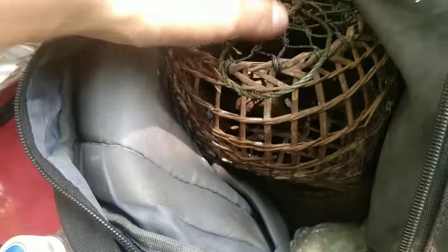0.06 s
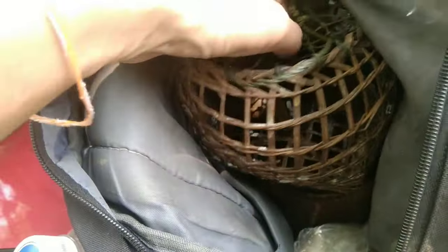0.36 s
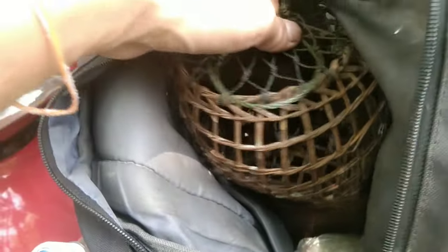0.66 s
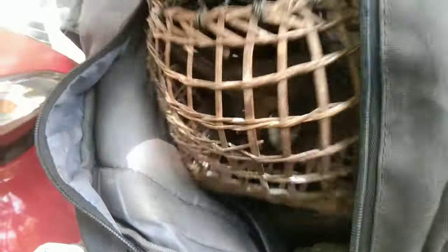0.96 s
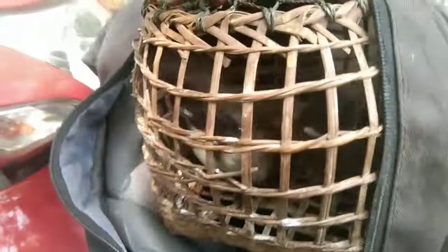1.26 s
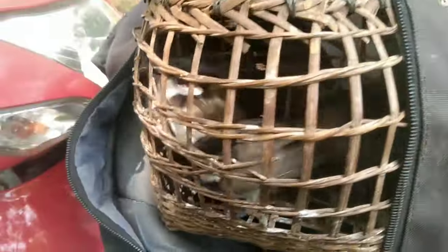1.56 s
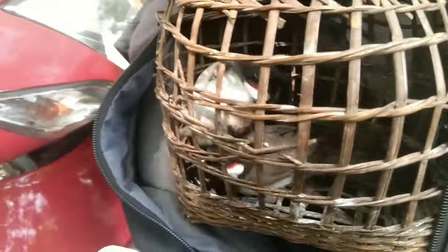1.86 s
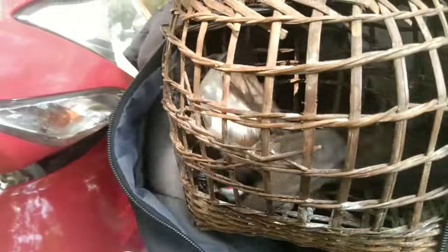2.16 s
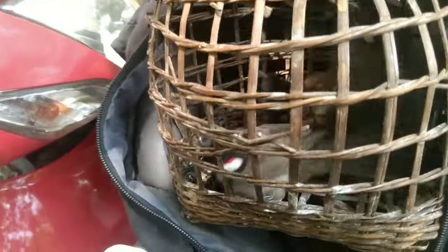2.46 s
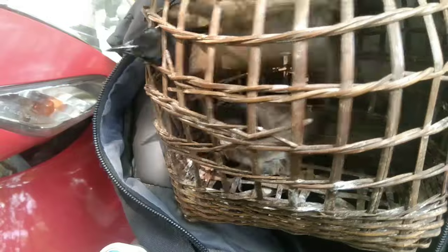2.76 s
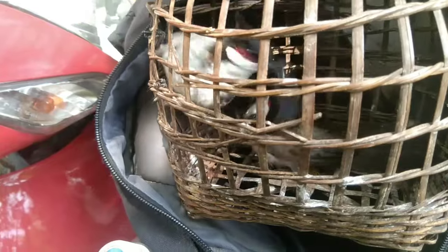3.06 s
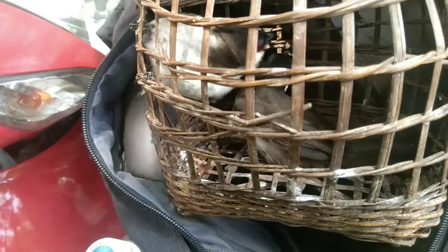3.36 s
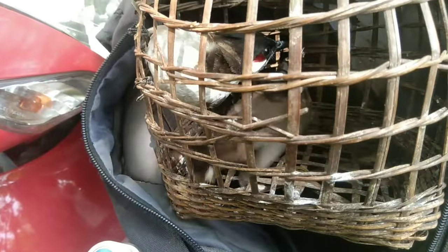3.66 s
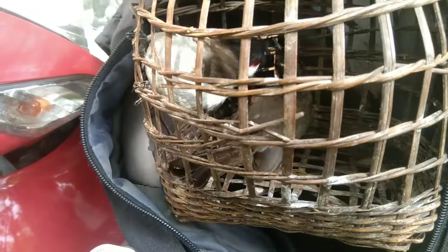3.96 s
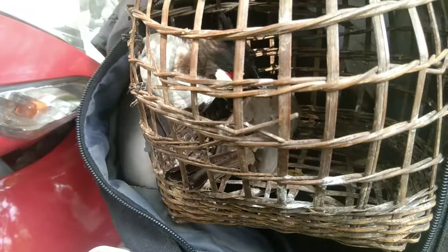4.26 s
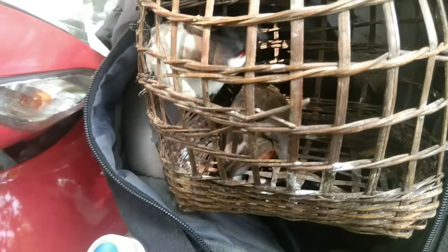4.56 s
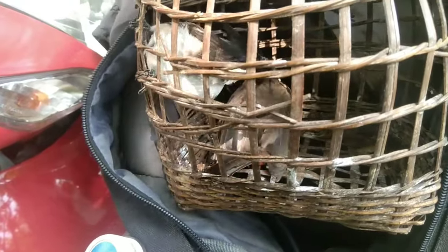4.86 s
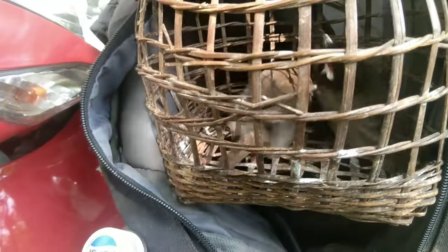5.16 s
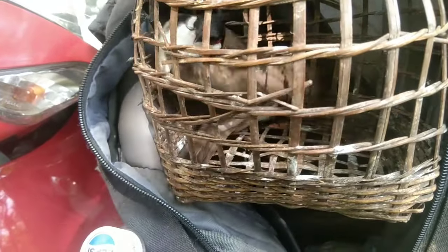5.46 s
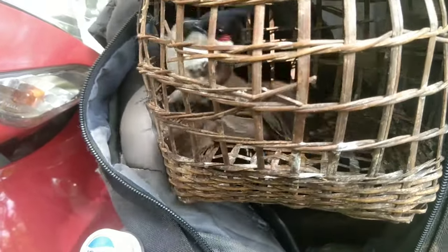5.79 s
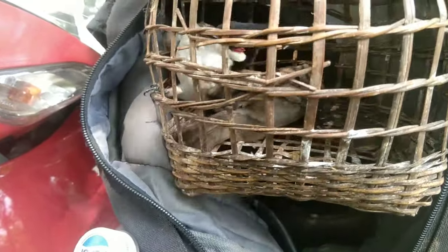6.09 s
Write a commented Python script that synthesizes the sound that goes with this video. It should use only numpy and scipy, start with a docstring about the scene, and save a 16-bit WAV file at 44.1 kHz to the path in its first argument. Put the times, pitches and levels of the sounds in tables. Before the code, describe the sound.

Birds flutter, scratch and bump inside a bamboo cage, whistling softly, with one sharp crack over faint outdoor insects.

```python
"""Wild birds shift and flutter in a woven bamboo cage that stands in an open backpack, outdoors.
Their feathers brush the weave, claws tick on the strips and bodies bump the cage. They whistle and
squeak softly, and once a strip snaps sharply. At the start the cage is moved: it creaks and rumbles
as cloth and a hand slide over it. Behind it all are a low rumble and a steady band of insects."""
import sys
import numpy as np
from scipy import signal
from scipy.fft import rfft, irfft
from scipy.io import wavfile
from scipy.ndimage import uniform_filter1d

SR = 44100
rng = np.random.default_rng(int(sys.argv[2]) if len(sys.argv) > 2 else 0)


def master(y):
    """Save y as 16-bit WAV."""
    cut = np.clip(np.atleast_2d(y).T, -1, 1)
    pcm = np.round(cut * 32767)  # scale
    wavfile.write(sys.argv[1], SR, pcm.astype(np.int16))


N = 270200
TIME = np.arange(N) / SR

# Tone shapes say how strong the low and high parts of a sound are. Columns: frequency_hz, gain_db
RUMBLE_TONE = [(25, -57), (60, -0.5), (100, 4.5), (210, -0.5), (350, -7), (600, -22.5), (900, -49),
               (1330, -19.5), (1550, -78), (4000, -47)]  # distant rumble
HISS_TONE = [(2000, -30), (2900, -8), (3900, -11), (5200, -5), (7500, 1), (9500, -8), (12000, -22),
             (15500, -40)]  # outdoor hiss
HOLLOW_TONE = [(120, -6), (290, -2.5), (450, -6), (1500, -29)]  # the hollow of the cage
SWISH_TONE = [(1200, -19), (2200, -15), (3050, -1), (3700, -6.5), (4800, -15), (5700, -6.5), (7400, 1),
              (8300, -7.5), (10000, -14), (15500, -29.5)]  # brushing over the weave
WEAVE_TONE = [(120, -7), (300, -0.5), (600, 0), (1400, 3.5), (1900, -0.5), (2500, 6), (3500, -24.5),
              (6000, -50)]  # the weave being pushed
SKIN_TONE = [(3000, -26), (5200, -6), (6500, 4.5), (7400, 11.5), (8500, 0.5), (10000, -8.5), (15500, -13.5)]  # a strip's hard skin
WOOD_TONE = [(900, -29), (1900, -25), (2800, 14.5), (3500, 10.5), (4500, 2), (6500, -34)]  # a strip bending
SNAP_TONE = [(300, -21), (1100, -24.5), (2100, -12), (4300, -12), (5800, -4.5), (7000, 3), (8500, 1.5),
             (9300, -9.5), (12700, -14), (15500, -35)]  # a strip cracking
SHIVER_TONE = [(800, -47), (2600, -14.5), (3800, -17), (5000, -5), (6800, 1), (10000, -13), (15500, -21)]  # the weave just after the crack

# Loudness over time. Columns: time_s, level_db
RUMBLE_LEVELS = [(0, -52), (0.3, -57), (2.8, -57), (3.7, -58.5), (6.13, -56)]  # distant rumble
JOSTLE_LEVELS = [(0, -56), (0.35, -57), (0.72, -65), (0.81, -48.5), (0.952, -54.5), (1.1, -58), (1.4, -75)]  # the cage jostled in the bag
SHUFFLE_LEVELS = [(1.3, -52.5), (2.0, -53.5), (3.0, -56), (3.5, -62.5), (3.73, -56.5), (3.87, -77),
                  (4.3, -72.5), (5.0, -67.5), (5.55, -56.5), (5.68, -64.5), (6.13, -73)]  # restless birds between flutters

# Movements on the weave. Columns: start_s, length_s, swish_db, push_above_swish_db
CLOTH_STROKES = [(-0.05, 0.94, -55.5, -3), (0.3, 0.085, -51, -16), (0.635, 0.052, -43.5, -14.5),
                 (0.77, 0.032, -41.5, -13.5), (0.88, 0.46, -46, -9), (1.07, 0.033, -43, -25)]  # the bag and the hand
BIRD_FLUTTERS = [(1.382, 0.076, -44, 4.5), (1.544, .14, -41, -1), (1.775, 0.039, -49, 0.5),
                 (2.099, 0.061, -47.5, 0.5), (2.191, 0.18, -61, 6.5), (2.389, 0.11, -40.5, -1),
                 (2.602, 0.022, -51, 0), (2.794, 0.18, -48, -1.5), (3.152, 0.058, -41.5, -28),
                 (3.278, 0.034, -46.5, -20), (3.585, .06, -52.5, -17), (3.634, 0.057, -55.5, 2.5),
                 (4.093, 0.07, -58, -28), (4.415, 0.035, -53, 0), (4.573, .06, -53, -26),
                 (4.811, 0.12, -53, -5), (5.037, 0.089, -51.5, -26), (5.133, 0.098, -49.5, -0.5),
                 (5.302, 0.091, -58, 2), (5.385, 0.089, -44, -2.5), (5.757, 0.12, -52, -25),
                 (5.898, .2, -54, -5.5)]  # a bird fluttering or shifting

# Bands of insect sound: pitch_hz, width_hz, level_db
INSECT_BANDS = [(4400, 43, -64.5), (4732, 245, -58), (4540, 1050, -62)]
# One rub of the bag's rim: start_s, length_s, level_db
RIM_RUB = (0.95, 0.36, -46)
# Creaks of the weave: start_s, length_s, level_db
WEAVE_CREAKS = [(0.009, .04, -46.5), (0.074, .08, -41.5), (0.231, .02, -44.5), (0.297, .02, -45)]
# How a slipping strip rings: pitch_hz, gain_db
STRIP_RINGS = [(1660, -4), (2500, -1.5)]
# The snap and its rebounds: start_s, level_db, fade_s (a fade is the time to die away by 60 dB)
SNAP_HITS = [(4.769, -11.5, 0.019), (4.781, -22, 0.012), (4.787, -20.5, 0.012), (4.799, -32, 0.02)]
# Bird calls: start_s, length_s, middle_pitch_hz, glide_octaves, level_db
WHISTLE_CALLS = [(2.010, 0.05, 920, 0.17, -60.5), (2.105, 0.045, 1130, -0.61, -51.5),
                 (2.195, 0.038, 1188, -.73, -49), (2.39, 0.059, 1918, -0.184, -44.5),
                 (2.449, 0.057, 1818, .03, -37), (2.532, 0.055, 1790, 0.046, -38.5),
                 (2.618, 0.087, 1573, 0.00033, -46), (2.689, 0.085, 1230, -.44, -54)]
SQUEAK_CALLS = [(5.962, 0.037, 3100, 0.21, -49), (6.015, .07, 3140, -0.063, -53)]  # heard at 3, 4 and 5 times the listed pitch
# How the cage floor rings: pitch_hz, fade_s
FLOOR_RINGS = [(78, .09), (150, .045), (235, .05), (345, .04), (520, .028), (800, .022)]
# Bodies hitting the cage: start_s, level_db, pitch_hz
BODY_BUMPS = [(0.031, -34, 850), (0.807, -45.5, 300), (0.915, -33.5, 265), (1.423, -37.5, 400),
              (1.609, -39, 295), (2.422, -31.5, 450), (2.838, -29, 138), (2.950, -41.5, 250),
              (3.663, -40.5, 322), (5.223, -38.5, 360), (5.481, -41.5, 713)]
# Clear taps of claws and wing tips: start_s, skin_db, pitch_hz, wood_db
CLAW_TAPS = [(0.488, -36.5, 9200, -60), (0.807, -24, 6900, -31), (0.9074, -35.5, 7300, -32.5),
             (1.411, -32, 7300, -36), (1.425, -28, 7160, -38), (1.4506, -31.5, 7600, -38),
             (1.5105, -29.5, 7300, -36.5), (1.5654, -38, 7440, -37), (1.6077, -32, 7400, -40),
             (1.624, -29, 7200, -48), (1.6744, -29, 7210, -34), (1.7523, -34, 6620, -45),
             (1.8889, -57, 7500, -42), (2.0347, -39, 6900, -46), (2.2426, -53, 5900, -38.5),
             (2.3285, -34, 7100, -45.5), (2.382, -22, 7930, -39), (2.422, -28.5, 7040, -29),
             (2.477, -29, 7800, -33.5), (2.516, -23.5, 8460, -39), (2.658, -36.5, 7200, -42.5),
             (2.724, -32.5, 7400, -44), (2.8528, -41, 6960, -34), (2.887, -47, 7360, -36.5),
             (2.9143, -57, 7240, -34), (2.9486, -31, 7200, -46), (3.0034, -37.5, 7550, -58),
             (3.1752, -25.5, 8040, -47), (3.3004, -23.5, 8300, -36), (3.471, -33, 7280, -39.5),
             (3.6635, -32.5, 7700, -45), (4.433, -39, 8460, -45), (4.834, -45, 6900, -38),
             (4.8566, -32, 6800, -33.5), (4.9009, -36.5, 7750, -41.5), (5.1655, -28.5, 6960, -31.5),
             (5.1883, -29, 7670, -40), (5.2143, -33, 7000, -44), (5.2897, -34.5, 6900, -33),
             (5.315, -29, 7200, -33), (5.344, -32.5, 7520, -60), (5.5032, -31.5, 7300, -39),
             (5.525, -31, 7000, -33), (5.889, -32, 7260, -44), (5.9249, -32.5, 6660, -34)]

STROKE_RISE_S, STROKE_FADE_S = 0.038, 0.59
FLUTTER_RISE_S, FLUTTER_FADE_S = 0.02, 0.29


def gain_of(db):
    """Turns decibels into a number to multiply a sound by."""
    return 10 ** (np.asarray(db) / 20)


def evened(x):
    """Scales a sound to an average (rms) level of one."""
    return x / np.sqrt(np.mean(x ** 2) + 1e-20)


def peak_evened(x, window=88):
    """Scales a sound so that its loudest moment has an rms level of one."""
    return x / np.sqrt(uniform_filter1d(x ** 2, window).max())


def fade(t, fade_s):
    """A level that starts at one and falls by 60 dB every fade_s."""
    return np.exp(-np.log(1000) * t / fade_s)


def add(mix, start_s, sound):
    """Mixes a sound in at the given time."""
    part = mix[max(round(start_s * SR), 0):][:len(sound)]
    part += sound[:len(part)]


def colour(x, tone, size=2048):
    """Filters a sound to give it a tone shape."""
    hz, db = np.transpose(tone)
    curve_db = np.interp(np.log(abs(np.fft.fftfreq(size, 1 / SR)) + 1), np.log(hz), db)
    log_gain = np.log(gain_of(np.maximum(curve_db, -100)))
    response = np.exp(np.conj(signal.hilbert(log_gain)))  # rings after a hit, never before it
    impulse = np.fft.ifft(response).real[:size // 2]
    return signal.oaconvolve(x, impulse)[:len(x)]


def noise(tone):
    """Steady noise with a tone shape."""
    return evened(colour(rng.standard_normal(N), tone))


def noise_band(pitch_hz, width_hz):
    """Steady noise gathered around one pitch."""
    distance = 2 * (np.fft.rfftfreq(N, 1 / SR) - pitch_hz) / width_hz
    return evened(irfft(rfft(rng.standard_normal(N)) / (1 + distance ** 4), N))


def wander(rate_hz):
    """A smooth random wobble, with changes up to about the given rate."""
    keep_slow = np.exp(-(np.fft.rfftfreq(N, 1 / SR) / rate_hz) ** 2)
    return evened(irfft(rfft(rng.standard_normal(N)) * keep_slow, N))


def burst(fade_s, tone, size=8192):
    """Noise that starts suddenly and dies away."""
    t = np.arange(size) / SR
    return peak_evened(colour(rng.choice([-1., 1.], size) * fade(t, fade_s), tone))


def echoes(x, echo_db, fade_s, size=16384):
    """Adds a short tail of scattered reflections."""
    t = np.arange(size) / SR
    tail = rng.standard_normal(size) * fade(t, fade_s) * (t > 0.003)
    return x + gain_of(echo_db) * signal.oaconvolve(x, tail / np.linalg.norm(tail))[:N]


def outdoors(rumble_boost_db=1, hiss_db=-57, insect_flicker_db=1.5):
    """A low distant rumble, a faint wide hiss and a chorus of insects in narrow bands."""
    rumble_db = np.interp(TIME, *np.transpose(RUMBLE_LEVELS)) + rumble_boost_db
    out = gain_of(rumble_db) * evened(colour(rng.standard_normal(N), RUMBLE_TONE, size=8192))
    out += gain_of(hiss_db) * noise(HISS_TONE)
    for pitch_hz, width_hz, level_db in INSECT_BANDS:
        out += noise_band(pitch_hz, width_hz) * gain_of(level_db + insect_flicker_db * wander(9.1))
    return out


def jostling(flicker_db=3):
    """The hollow of the cage rumbles unevenly while the bag is pulled about it."""
    time_s, level_db = np.transpose(JOSTLE_LEVELS)
    level = gain_of(np.interp(TIME, time_s, level_db) + flicker_db * wander(27))
    return level * (TIME < time_s[-1]) * noise(HOLLOW_TONE)


def creaks(slips_per_s=100, jitter=0.33, spread_db=2, fade_s=0.025):
    """Strips stick and slip against each other; each slip rings briefly and roughly on one pitch."""
    out = np.zeros(N)
    for start_s, length_s, level_db in WEAVE_CREAKS:
        slips = rng.uniform(-1, 1, (round(length_s * slips_per_s), 3))
        for k, (late, detune, strength) in enumerate(slips):
            ring_hz, ring_db = STRIP_RINGS[k % len(STRIP_RINGS)]
            hz = ring_hz * (1 + 0.072 * detune)
            tone = [(hz / 2, -32), (hz * 0.954, -12), (hz, 0), (hz / 0.88, -12), (hz * 2, -48)]
            slip = gain_of(level_db + ring_db + spread_db * strength) * burst(fade_s, tone)
            add(out, start_s + (k + jitter * late) / slips_per_s, slip)
    return out


def movements(rows, rise_s, fade_s):
    """Strength of swish and push over time: each movement swells, holds and dies away."""
    swish_power, push_power = np.zeros(N), np.zeros(N)
    for start_s, length_s, swish_db, push_above_db in rows:
        swell = np.clip((TIME - start_s) / rise_s, 0, 1)
        shape = swell * fade(np.clip(TIME - start_s - length_s, 0, 2), fade_s)
        swish_power += (gain_of(swish_db) * shape) ** 2
        push_power += (gain_of(swish_db + push_above_db) * shape) ** 2
    return np.sqrt([swish_power, push_power])


def rustle(swish, push, catches_per_s, spread_db, flicker_db, grainy_share=0.37, strips=5):
    """Something slides over the weave with uneven pressure: a smooth swish plus tiny catches."""
    strength = gain_of(spread_db * np.minimum(rng.exponential(1, N), 3.5))
    catches = strength * (rng.random(N) < catches_per_s / SR) * rng.choice([-1, 1], N)
    strip_hit = rng.integers(0, strips, N)
    out = np.zeros(N)
    for tone, level in (SWISH_TONE, swish), (WEAVE_TONE, push):
        grains = np.zeros(N)
        for k, shift in enumerate(np.geomspace(0.9, 1.1, strips)):  # each strip has its own pitch
            grains += colour(catches * (strip_hit == k), [(hz * shift, db) for hz, db in tone])
        out += level * (np.sqrt(grainy_share) * evened(grains) + np.sqrt(1 - grainy_share) * noise(tone))
    return out * gain_of(flicker_db * wander(63))


def cloth(boost_db=1.5):
    """The bag and the hand slide over the weave in a few strokes."""
    swish, push = gain_of(boost_db) * movements(CLOTH_STROKES, STROKE_RISE_S, STROKE_FADE_S)
    return rustle(swish, push, catches_per_s=2500, spread_db=5, flicker_db=0.9)


def rim_rasp(pitch_hz=7300, width_hz=1050, flicker_db=2):
    """A tight, dry rasp while the cage slides past the rim of the bag."""
    level, _ = movements([(*RIM_RUB, 0)], STROKE_RISE_S, STROKE_FADE_S)
    return level * noise_band(pitch_hz, width_hz) * gain_of(flicker_db * wander(80))


def strip_snap(shiver_db=-25, shiver_fade_s=0.26):
    """A strip cracks against its neighbours, rebounds, and leaves the weave shivering."""
    out = np.zeros(N)
    for start_s, level_db, fade_s in SNAP_HITS:
        add(out, start_s, gain_of(level_db) * burst(fade_s, SNAP_TONE))
    add(out, SNAP_HITS[0][0], gain_of(shiver_db) * burst(shiver_fade_s, SHIVER_TONE, size=16384))
    return out


def calls(rows, arch_octaves, wobble):
    """Start, phase and loudness of each call: it swells and fades as its pitch slides in a small arch."""
    for start_s, length_s, middle_hz, glide_octaves, level_db in rows:
        position = np.linspace(-1, 1, round(length_s * SR))  # 0 is the middle of the call
        octaves = glide_octaves * position / 2 - arch_octaves * position ** 2
        pitch_hz = middle_hz * 2 ** octaves * wobble[round(start_s * SR):][:len(position)]
        level = gain_of(level_db) * np.sqrt(2) * np.cos(np.pi * position / 2)
        yield start_s, 2 * np.pi * np.cumsum(pitch_hz) / SR, level


def squeaks(waver=0.0042, arch_octaves=0.038):
    """Thin, unsteady bird calls in which only the third to fifth harmonics sound."""
    out = np.zeros(N)
    for start_s, phase, level in calls(SQUEAK_CALLS, arch_octaves, 1 + waver * wander(200)):
        voice = np.sin(3 * phase) + gain_of(-14) * np.sin(4 * phase) + gain_of(-22) * np.sin(5 * phase)
        add(out, start_s, level * voice)
    return out


def whistles(waver=0.017, arch_octaves=0.067, flicker_db=3):
    """A run of bird whistles, made slightly husky by fast wobbles in pitch and loudness."""
    out = np.zeros(N)
    for start_s, phase, level in calls(WHISTLE_CALLS, arch_octaves, 1 + waver * wander(130)):
        add(out, start_s, level * np.sin(phase))
    return out * gain_of(flicker_db * wander(180))


def body_bumps(slap_db=-5, reach_octaves=0.6, size=8192):
    """A bird's body slaps the weave, and the cage floor rings most near the pitch of the blow."""
    out, t = np.zeros(N), np.arange(size) / SR
    for start_s, level_db, pitch_hz in BODY_BUMPS:
        ring = np.zeros(size)
        for ring_hz, fade_s in FLOOR_RINGS:
            nearness = np.exp(-(np.log2(ring_hz / pitch_hz) / reach_octaves) ** 2 / 2)
            wave = rng.choice([-1, 1]) * np.sin(2 * np.pi * ring_hz * rng.uniform(0.817, 1.16) * t)
            ring += nearness * fade(t, fade_s) * wave
        slap = gain_of(slap_db) * burst(0.0062, WEAVE_TONE)
        add(out, start_s, gain_of(level_db) * (ring / abs(ring).max() + slap))
    return out


def contact(tone, shift, lead_s, fade_s, scrape_db, size=4096):
    """A short knock, lead_s into the sound, inside a softer scrape that builds just before it."""
    t = np.arange(size) / SR - lead_s
    knock = fade(abs(t), fade_s) * (t >= 0)
    scrape = gain_of(scrape_db) * np.exp(-np.maximum(t / 0.01, -t / 0.0018))
    hit = rng.choice([-1., 1.], size) * np.hypot(knock, scrape)
    return peak_evened(colour(hit, [(hz * shift, db) for hz, db in tone]))


def light_taps(taps_per_s=22, above_swish_db=5, spread_db=4, wood_gain_db=-22, pitch_hz=7300):
    """Small random taps during the flutters, as rows like those of CLAW_TAPS."""
    rows = []
    for start_s, length_s, swish_db, _ in BIRD_FLUTTERS:
        for when, strength, detune in rng.uniform(-0.77, 1, (round(length_s * taps_per_s), 3)):
            tap_s = start_s + FLUTTER_RISE_S + length_s * (when + 1) / 2
            skin_db = swish_db + above_swish_db + spread_db * strength
            rows.append((tap_s, skin_db, pitch_hz * (1 + 0.049 * detune), skin_db + wood_gain_db))
    return rows


def claw_ticks(skin_gain_db=-1, weave_gain_db=-8, lead_s=512 / SR):
    """A claw or wing tip scrapes a strip's hard skin and bends it, which sounds the hollow weave."""
    out = np.zeros(N)
    skin_peak_hz, _ = max(SKIN_TONE, key=lambda point: point[1])
    for start_s, skin_db, pitch_hz, wood_db in CLAW_TAPS + light_taps():
        shift = rng.uniform(0.89, 1.06)  # no two strips are equally stiff
        skin = contact(SKIN_TONE, pitch_hz / skin_peak_hz, lead_s, fade_s=0.013, scrape_db=-18)
        wood = contact(WOOD_TONE, shift, lead_s, fade_s=0.011, scrape_db=-16)
        weave = contact(WEAVE_TONE, shift, lead_s, fade_s=0.011, scrape_db=-12)
        bending = gain_of(wood_db) * (wood + gain_of(weave_gain_db) * weave)
        add(out, start_s - lead_s, gain_of(skin_db + skin_gain_db) * skin + bending)
    return out


def feathers(swish_gain_db=1, push_gain_db=-6, shuffle_push_db=1):
    """Feathers brush the weave in short flutters, with quiet shuffling between them."""
    time_s, level_db = np.transpose(SHUFFLE_LEVELS)
    shuffle = gain_of(np.interp(TIME, time_s, level_db)) * (TIME > time_s[0])
    flutter_swish, flutter_push = movements(BIRD_FLUTTERS, FLUTTER_RISE_S, FLUTTER_FADE_S)
    swish = gain_of(swish_gain_db) * np.hypot(flutter_swish, shuffle)
    push = gain_of(push_gain_db) * np.hypot(flutter_push, shuffle * gain_of(shuffle_push_db))
    return rustle(swish, push, catches_per_s=400, spread_db=2, flicker_db=3)


def scene():
    """The cage close by, the birds' voices, and the open air."""
    hits = echoes(claw_ticks(), echo_db=-11.5, fade_s=0.32) + strip_snap() + body_bumps()
    rubbing = creaks() + jostling() + cloth() + rim_rasp() + feathers()
    voices = echoes(whistles() + squeaks(), echo_db=-9, fade_s=0.4)
    return (hits + rubbing + voices + outdoors())[None]


def record(dry, low_cut_hz=42, high_cut_hz=15700):
    """The microphone drops the deepest bass, and the highest treble is cut off."""
    bass_cut = signal.butter(2, low_cut_hz, "highpass", fs=SR, output="sos")
    treble_cut = signal.firwin(301, high_cut_hz, window=("kaiser", 9), fs=SR)
    return signal.oaconvolve(signal.sosfilt(bass_cut, dry), treble_cut[None], "same")


dry = scene()
out = record(dry)
master(out)
```